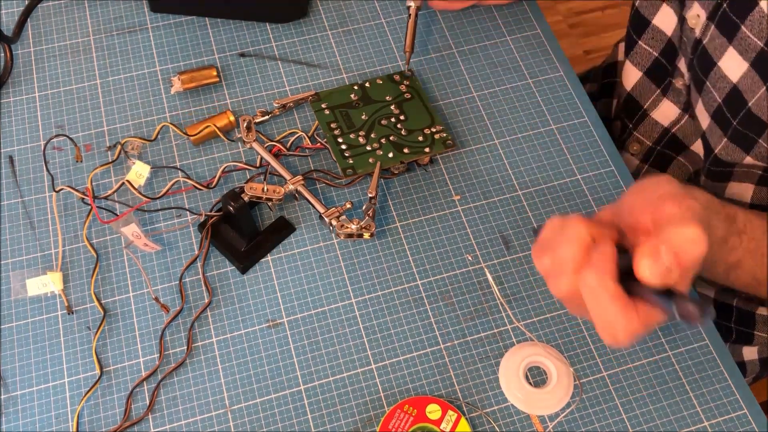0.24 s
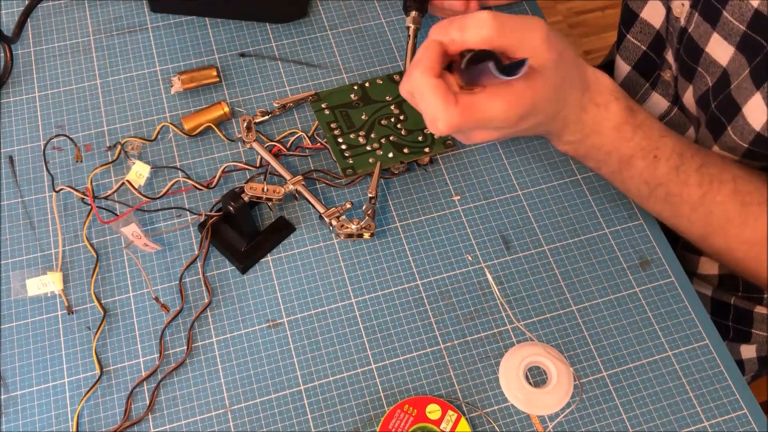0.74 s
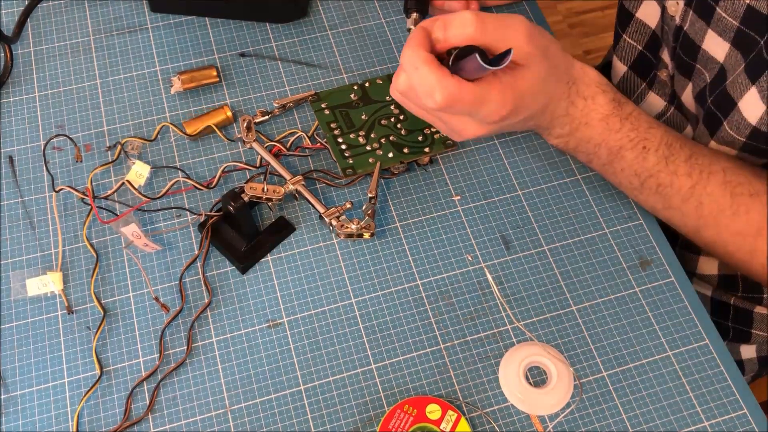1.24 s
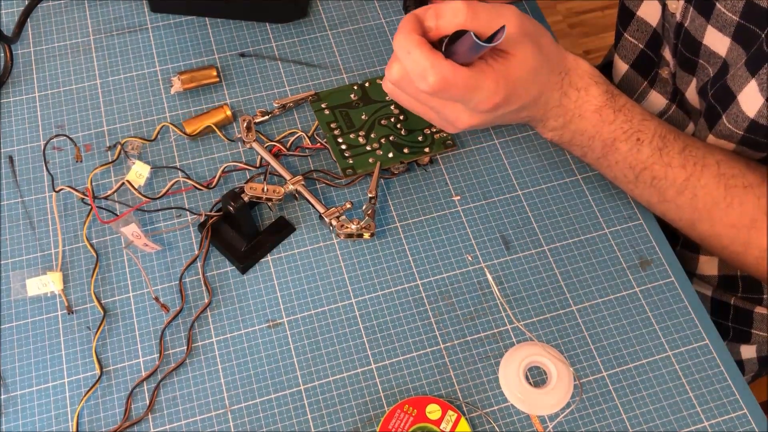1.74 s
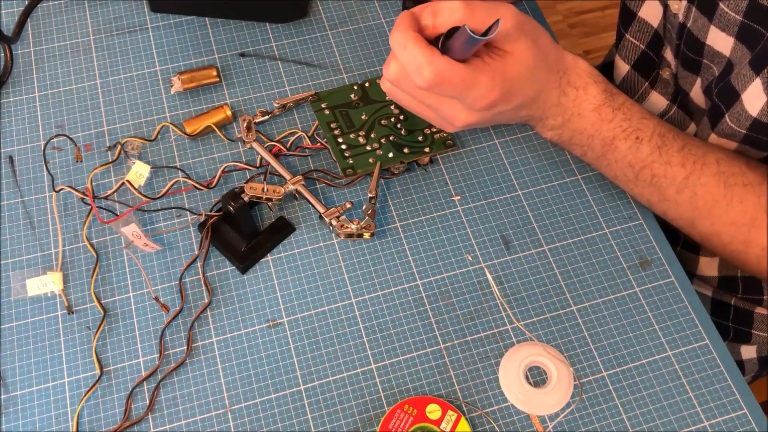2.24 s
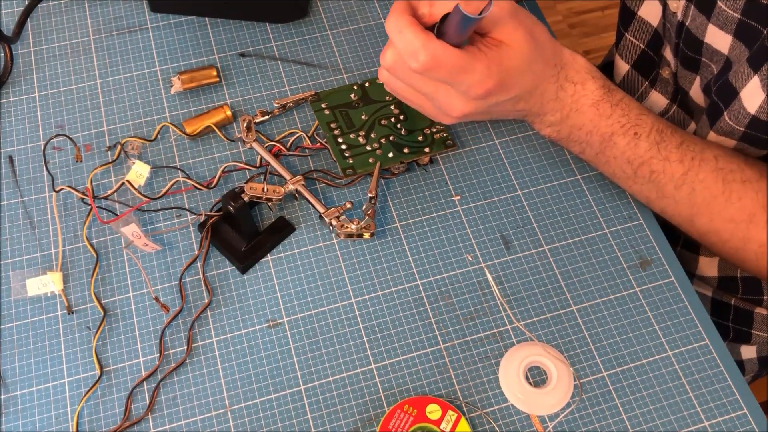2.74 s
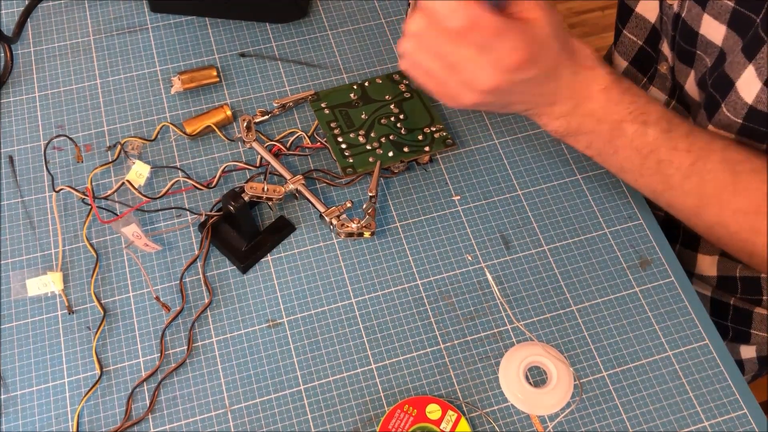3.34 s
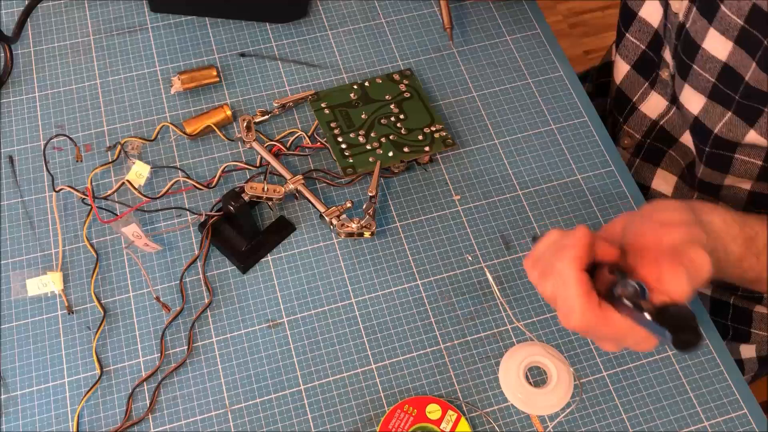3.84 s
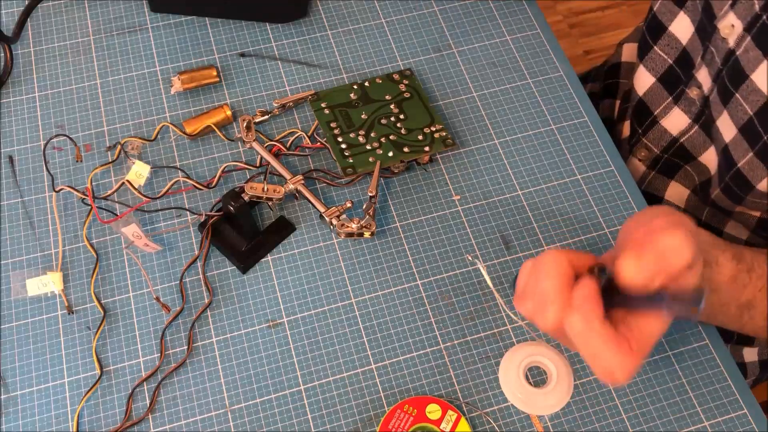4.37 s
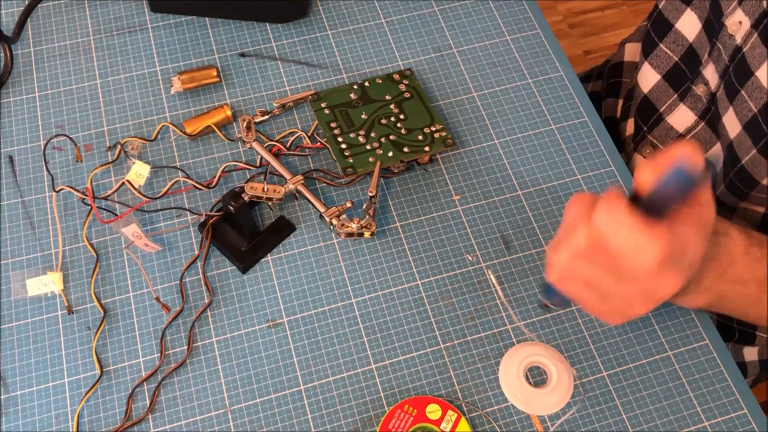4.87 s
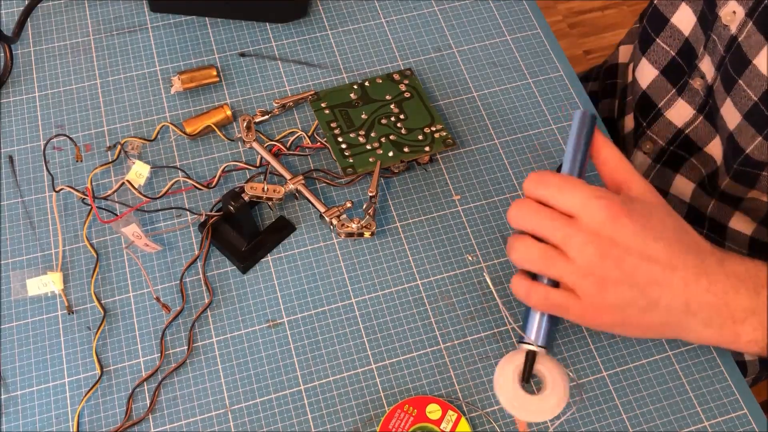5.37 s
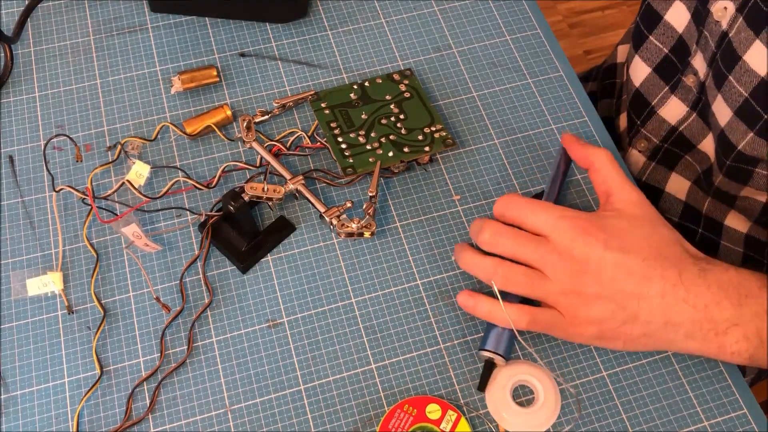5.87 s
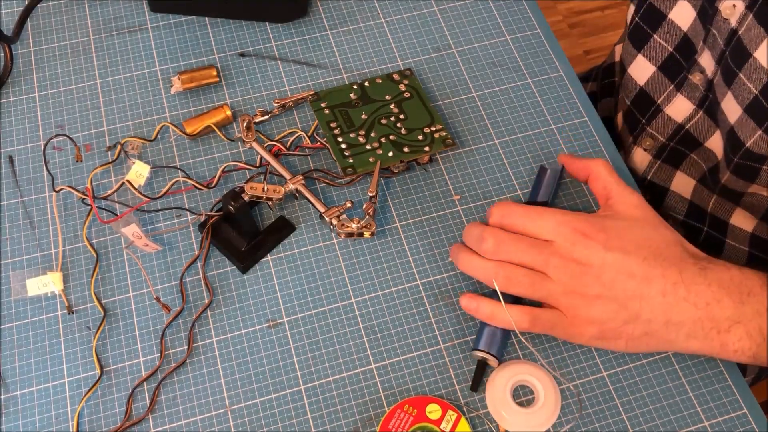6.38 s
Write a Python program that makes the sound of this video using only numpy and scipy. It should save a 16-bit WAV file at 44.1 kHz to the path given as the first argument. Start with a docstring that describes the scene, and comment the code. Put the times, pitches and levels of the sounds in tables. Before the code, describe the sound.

A small room, close microphone, low steady rumble and very faint hiss. At 0 s a spring pump's catch snaps with a short metallic twang; tiny plastic ticks follow around 0.2-0.3 s. Then near quiet, with a faint low hum swelling from 2.4 s and stopping about 3.25 s, and soft nozzle nudges on the board at 2.8 and 3.1 s. At 3.25 s the pump fires: a hard, bright double-edged snap with a rush, ringing tube and bench thump. Light ticks near 3.5 s. From 4.2 s gritty plunger friction grows into a loud latch clack at 4.35 s, then five smaller hollow knocks with chirping spring twangs until 5 s. Four soft, grainy sponge dabs at 5.3, 5.5, 5.7 and 5.9 s carry low bumps, faint sizzle and small tray ticks. At 6.4-6.5 s the iron scrapes and bounces into its stand, clattering with a short metallic ring, cut off near the end.

```python
"""Solder sucker and iron at a workbench

A spring-loaded solder sucker latches, fires on a circuit board and is cocked again, its spring twanging.
Its knocks are excited resonances with noise cracks; dispersion in the coil turns each twang into a chirp.
The soldering iron is dabbed four times on its sponge (grainy noise) and dropped into its stand (ringing modes).
A small room adds diffuse tails over a low steady rumble, a faint hiss and a brief hum.
"""
import sys
import numpy as np
from scipy import signal
from scipy.fft import rfft, irfft, next_fast_len
from scipy.io import wavfile

SR = 44100
rng = np.random.default_rng(int(sys.argv[2]) if len(sys.argv) > 2 else 0)


def master_out(mix):
    """Clip the mix to full scale and print it as 16-bit PCM to the path in sys.argv[1]."""
    frames = np.transpose(np.atleast_2d(mix))
    ceiling = np.clip(frames, -1, 1)
    pcm = np.round(ceiling * 32767).astype(np.int16)
    wavfile.write(sys.argv[1], SR, pcm)


N = 291501
T = np.arange(int(.7 * SR)) / SR  # time within one event, s
TIME = np.arange(N) / SR  # time within the scene, s

# Nozzle nudging the board. Each row: start in seconds, bench level in dB, tap level in dB.
NOZZLE_NUDGES = [(2.83, -41.5, -74.5), (3.142, -40.5, -60)]
# Catch locking the plunger. Each row: start in seconds, body level in dB, crack level in dB, room level in dB.
CATCH_LATCHES = [(-.0004, -27.5, -25, -1.5), (4.346, -19, -15.5, -9.5)]
# Squeezed spring slipping in the barrel. Each row: start in seconds, knock level in dB, travel time down
# the coil in seconds, twang level in dB, lag of 1 kHz behind the treble in seconds, rebound level in dB.
SPRING_SLIPS = [(4.476, -37.5, .010, -41, .002, -33.5), (4.589, -37.5, .0112, -31.5, 0.00102, -54),
                (4.7330, -34, .012, -36, .0027, -29), (4.8224, -35, .0143, -34.5, 0.001106, -68),
                (4.9547, -39, 0.011, -36.5, 0.004, -33)]
# Light, dry contacts in the pump. Each row: start in seconds, barrel level in dB, crack level in dB.
PUMP_CONTACTS = [(.228, -55.5, -61.5), (0.2922, -38.5, -36), (0.3095, -32, -41.5), (1.6474, -79, -69),
                 (3.2264, -63, -69), (3.5246, -42, -56), (3.551, -57, -60), (4.152, -56.5, -61.5),
                 (4.5741, -45, -37)]
# Plunger catching on its way down. Each row: start in seconds, level in dB.
PLUNGER_SNAGS = [(4.284, -43.5), (4.314, -47)]
# Dabs on the sponge. Each row: start in seconds, landing level in dB, wipe level in dB,
# bench level at landing in dB, sizzle t60 in seconds.
IRON_DABS = [(5.316, -43, -48.5, -39, 1.6), (5.524, -40.5, -57, -69, 0.13),
             (5.708, -44.5, -55, -40.5, 0.76), (5.914, -47, -55, -39, 0.4)]
# Tip ticking on the sponge tray. Each row: start in seconds, level in dB.
TRAY_TICKS = [(5.4441, -44), (5.495, -49.5), (5.5464, -43.5), (5.7549, -45.5), (6.339, -56.5)]
# Iron striking its stand. Each row: start in seconds, ring level in dB, clatter level in dB,
# scrape level in dB, bench level in dB before the low-pass of the feet.
STAND_STRIKES = [(6.407, -17.5, -22, -33.5, -26), (6.4405, -23, -24, -36, -38),
                 (6.4969, -17, -20, -23, -45), (6.508, -23, -22, -53, -16)]

# Barrel resonances, shifted together to the pitch of each knock.
# Each row: nominal centre in Hz, nominal width in Hz, level in dB.
BARREL_RESONANCES = [(1145, 160, -21), (2657, 1300, -28), (3710, 400, -5.5), (5270, 1100, -21)]
# Coil resonances, shifted together by the lag of each twang.
# Each row: nominal centre in Hz, nominal width in Hz, level in dB.
SPRING_RESONANCES = [(554, 270, -14.5), (1200, 180, -2), (1586, 180, -5), (2700, 760, -9),
                     (3600, 280, -8.5), (5470, 800, -10.5)]
# Resonances of the catch. Each row: centre in Hz, width parameter in Hz, level in dB.
CATCH_RESONANCES = [(1050, 320, -21), (2830, 550, -6), (3557, 410, -3), (3840, 440, -3), (5630, 440, -8),
                    (6330, 520, -13)]
# Narrow low tones of the room. Each row: centre in Hz, width in Hz, level in dB.
DRONE_RESONANCES = [(79, 11, 1.5), (203, 8, 1), (288.7, 2.7, -7)]

# Modes of the bench. Each row: frequency in Hz, mean relative level in dB, t60 in seconds.
BENCH_MODES = [(85, -14, .2), (110, -5, .13), (130, 0, .48), (163, -5, .28), (195, -9, .14), (285, -5, .28),
               (410, -15, .2), (465, -13, .3), (645, -18, .2)]
# Modes of the pump's tube. Each row: frequency in Hz, mean relative level in dB, t60 in seconds.
TUBE_MODES = [(985, -22, .6), (3230, -6, .28), (3400, -6, .2), (4285, -9, .3), (5585, -7, .33),
              (6697, -4, .3), (6785, 0, .32), (10470, -6, .22), (10850, -5, .3), (14090, -9, .18),
              (14665, -4, .16)]
# Modes of the iron's stand. Each row: frequency in Hz, mean relative level in dB, t60 in seconds.
STAND_MODES = [(469, -4, .35), (523, -8, .5), (634, -6, .35), (700, -7, .25), (723, -6, .25), (765, 1, .3),
               (786, -1, .3), (840, -11, .35), (880, -8, .25), (1132, -4, .18), (1154, -3, .2),
               (1293, -10, .35), (1556, -15, .25), (1637, -10, .17), (2245, -18, .3), (2837, -11, .1)]

# Bright crack of hard parts. Each row: frequency in Hz, relative level in dB per Hz.
CRACK_SPECTRUM = [(300, -36.5), (1500, -15.5), (2500, -6.5), (4600, -6.5), (7000, -4.5), (10000, -4),
                  (12500, -7), (15000, -7), (17000, -12)]
# Crack of the catch. Each row: frequency in Hz, relative level in dB per Hz.
LATCH_SPECTRUM = [(500, -47.5), (1600, -30.5), (2400, -4.5), (4600, -6), (6000, -15), (8000, -2),
                  (9700, -1.5), (11000, 0.5), (12800, -4.5), (15000, -10), (17000, -17)]
# Rush of the shot and snags of the plunger. Each row: frequency in Hz, relative level in dB per Hz.
RATTLE_SPECTRUM = [(100, -12), (350, 3), (750, -1), (1200, -10), (2200, -7), (3400, 0), (4600, -3),
                   (8500, -4.5), (11000, 1), (12500, -3.5), (15000, 0.5), (17000, -23)]
# Clatter of the stand and tap of the nozzle. Each row: frequency in Hz, relative level in dB per Hz.
CLATTER_SPECTRUM = [(80, -29), (200, -3.5), (350, -3.5), (500, 2), (800, -0.5), (1400, -4.5), (3000, -4),
                    (4500, -13), (6200, -11), (9000, -29.5), (16000, -33)]
# Scrape of the iron in its holder. Each row: frequency in Hz, relative level in dB per Hz.
SCRAPE_SPECTRUM = [(1500, -21.5), (3000, -14), (4500, -2), (6000, -2), (9500, 3), (12000, -4.5),
                   (16000, -11)]
# Rub on the sponge. Each row: frequency in Hz, relative level in dB per Hz.
SPONGE_SPECTRUM = [(53, -35), (90, -16), (142, 0), (192, -26), (284, -17), (448, 1), (661, -14),
                   (804, -5.5), (1380, -14.5), (2530, -7.5), (4080, -26), (4960, -31), (15000, -27.5),
                   (16000, -34)]
# Tick on the tray. Each row: frequency in Hz, relative level in dB per Hz.
TRAY_SPECTRUM = [(300, -8), (900, 5), (2000, -7), (4000, -6.5), (6000, -23), (15000, -25)]
# Sizzle of the damp sponge. Each row: frequency in Hz, relative level in dB per Hz.
STEAM_SPECTRUM = [(1000, -10), (3500, -17), (5000, 4), (9000, -5.5), (15000, 0.5)]
# Low rumble of the room. Each row: frequency in Hz, relative level in dB per Hz.
RUMBLE_SPECTRUM = [(12, -73.5), (20, -41.5), (60, -4), (83, -1), (107, -21.5), (130, -2.5), (187, -1.5),
                   (328, -7.5), (357, -13), (410, -12), (446, -17), (660, -23), (3740, -39.5), (14300, -44),
                   (16000, -59)]
# Faint background hiss. Each row: frequency in Hz, relative level in dB per Hz.
HISS_SPECTRUM = [(500, -4.5), (3300, -2.5), (6000, -9), (15000, -13.5)]
# Reverberation of the room. Each row: frequency in Hz, t60 in seconds.
ROOM_DECAY = [(100, 0.51), (700, 0.64), (2000, 0.52), (3600, 0.41), (6000, 0.42), (10000, 0.26),
              (15000, 0.33)]

SHOT_S, PISTON_FLIGHT_S = 3.249, .0155  # the pump fires; time until the piston hits its stop
BOUNCE_S = .0107  # the piston lands once more after this time
TRAVEL_S, LAG_S = .014, .0012  # a hard blow runs down the coil in this time, with this lag at 1 kHz
TWANG_DROOP = 0.25  # exponent: the more smeared a twang, the lower it sounds
SLIP_T60_S, SLIP_SMEAR = 0.011, 6.2  # a slip's knock lasts this long, plus this many times its lag
REBOUND_LEAD_S = .003  # the coil slaps the barrel just ahead of its twang
CLICK_T60_S, CLICK_RISE_SHARE = .007, 0.077  # decay of a light contact; rise of any contact as a share of its t60
COCKED_HZ, SLACK_HZ = 3604, 3150  # the barrel's third resonance is lower while the spring is let out
GRIP_SPREAD = .025  # spread of the log of the barrel's pitch from knock to knock
SLIDE_START_S, SLIDE_LENGTH_S = 4.22, .112
SLIDE_DB, SLIDE_GROWTH = -42.5, 1.4  # friction grows as this power of the stroke's progress
RUSTLE_S, RUSTLE_LENGTH_S, RUSTLE_DB = 3.945, 0.055, -67  # the fingers shift their grip
DAB_RISE_S, DAB_T60_S = 0.014, .16
WIPE_S = 0.047  # time from landing to wiping the tip off
SIZZLE_DB, SIZZLE_RISE_S = -57.5, 0.011
FEET_HZ = 230  # the stand's feet pass only the bass on to the bench
FLOOR_DB = -60  # room rumble
HUM_HZ, HUM_DB = 231, -54  # a faint hum and the level it reaches
HUM_START_S, HUM_LENGTH_S, HUM_RELEASE_S = 2.4, .83, .06
TOP_HZ = 15950  # band limit of the recorder


def pump_shot():
    """Impact and recoil: the piston rushes up, hits its stop and bounces, ringing tube and bench."""
    out = np.zeros(N)
    for s, bench_db, tap_db in NOZZLE_NUDGES:
        add(out, s, amp(bench_db) * ring(BENCH_MODES, rise=.02, spread_db=1))
        tap = burst(CLATTER_SPECTRUM, rise=.002, t60=.04)
        add(out, s, amp(tap_db) * in_room(tap, wet_db=1))

    release, stop = SHOT_S, SHOT_S + PISTON_FLIGHT_S
    add(out, release, barrel_click(release, barrel_db=-26.5, crack_db=-24.0, t60=.02))
    rush = burst(RATTLE_SPECTRUM, rise=0.00074, t60=0.093)
    add(out, release, amp(-19) * in_room(rush, wet_db=-3))
    tube = ring(TUBE_MODES, rise=0.004, spread_db=1)
    add(out, release, amp(-28) * in_room(tube, wet_db=-5.5))
    add(out, release + TRAVEL_S, twang(twang_db=-26.0, crack_db=-29, lag=LAG_S))

    impact = burst(CRACK_SPECTRUM, rise=0.00053, t60=0.04)
    add(out, stop, amp(-22.5) * in_room(impact, wet_db=-12.5))
    recoil = ring(BENCH_MODES, rise=0.00665, spread_db=1.5)
    add(out, stop - .003, amp(-15.0) * recoil)  # the recoil starts before the piston lands
    add(out, stop + BOUNCE_S, barrel_click(stop, barrel_db=-35, crack_db=-26.5, t60=0.0083))
    return out


def pump_latches():
    """Impulse excitation: the catch snaps into its groove, sounds its resonances and jolts the spring."""
    out = np.zeros(N)
    for s, body_db, crack_db, wet_db in CATCH_LATCHES:
        grit = rng.standard_normal(len(T)) * swell(rise=0.00072, t60=0.01)
        contact = signal.unit_impulse(len(T)) + 0.035 * grit
        knock = blow(filtered(contact, lambda hz: body(CATCH_RESONANCES, hz, order=2)))
        add(out, s, amp(body_db) * in_room(knock, wet_db + 1))  # the duller knock carries further into the room
        crack = burst(LATCH_SPECTRUM, rise=0.00044, t60=.011)
        add(out, s, amp(crack_db) * in_room(crack, wet_db))
        add(out, s + TRAVEL_S, twang(twang_db=-33.0, crack_db=-35, lag=LAG_S))
    return out


def spring_slips():
    """Stick-slip and wave travel: each slip knocks the barrel, runs down the coil, slaps its end and twangs."""
    out = np.zeros(N)
    for s, knock_db, travel, twang_db, lag, rebound_db in SPRING_SLIPS:
        knock_t60 = SLIP_T60_S + SLIP_SMEAR * lag
        add(out, s, barrel_click(s, knock_db, knock_db - 4.5, knock_t60))
        add(out, s + travel - REBOUND_LEAD_S, barrel_click(s, rebound_db, rebound_db - .8, t60=0.02))
        add(out, s + travel, twang(twang_db, crack_db=twang_db - 1.0, lag=lag))
    return out


def twang(twang_db, crack_db, lag):
    """Dispersion: bending waves in the coil carry treble faster than bass, so a jolt becomes a falling chirp."""
    jolt = signal.unit_impulse(len(T)) + .08 * rng.standard_normal(len(T)) * fade(0.017)
    droop = (lag / LAG_S) ** TWANG_DROOP

    def coil(hz):
        # group delay is lag * sqrt(1000 / hz)
        dispersion = np.exp(-4j * np.pi * lag * np.sqrt(1000 * hz))
        return body(SPRING_RESONANCES, hz * droop) * dispersion

    chirp = blow(filtered(jolt, coil))
    crack = burst(CRACK_SPECTRUM, rise=.0004, t60=0.02)
    return in_room(amp(twang_db) * chirp + amp(crack_db) * crack, wet_db=-8.5)


def barrel_click(s, barrel_db, crack_db, t60):
    """Resonance: a knock in the barrel gives a bright crack and a short hollow ring, pitched for time s."""
    slack = SHOT_S < s < SLIDE_START_S
    pitch = (SLACK_HZ if slack else COCKED_HZ) * np.exp(GRIP_SPREAD * rng.standard_normal())
    scale = BARREL_RESONANCES[2][0] / pitch  # brings the third resonance to the pitch
    rise = CLICK_RISE_SHARE * t60
    contact = rng.standard_normal(len(T)) * swell(rise, t60)
    barrel = blow(filtered(contact, lambda hz: body(BARREL_RESONANCES, hz * scale, order=2)))
    crack = burst(CRACK_SPECTRUM, rise, t60)
    return amp(barrel_db) * in_room(barrel, wet_db=-6.0) + amp(crack_db) * in_room(crack, wet_db=-8.5)


def pump_clicks():
    """Light impacts: loose parts tick as the pump is handled."""
    out = np.zeros(N)
    for s, barrel_db, crack_db in PUMP_CONTACTS:
        add(out, s, barrel_click(s, barrel_db, crack_db, CLICK_T60_S))
    return out


def plunger_slide():
    """Dry friction: gritty rubbing grows as the thumb drives the plunger down, catching now and then."""
    grit = noise(CRACK_SPECTRUM, N) * grain(N, rate=1100, depth_db=3.0)
    hollow = filtered(rng.standard_normal(N), lambda hz: body(CATCH_RESONANCES, hz, order=2))
    push = ramp(SLIDE_START_S, SLIDE_LENGTH_S, release=.018) ** SLIDE_GROWTH
    rubbing = amp(SLIDE_DB) * push * (amp(-1) * unit(grit) + amp(-5.5) * unit(hollow))
    for s, db in PLUNGER_SNAGS:
        add(rubbing, s, amp(db) * burst(RATTLE_SPECTRUM, rise=.002, t60=0.024))
    return in_room(rubbing, wet_db=-5.0)


def grip_rustle():
    """Light friction: skin brushes the barrel as noise shortly before the pump is cocked."""
    return amp(RUSTLE_DB) * ramp(RUSTLE_S, RUSTLE_LENGTH_S, release=.015) * noise(CRACK_SPECTRUM, N)


def iron_into_stand():
    """Modal ringing: the iron scrapes and bounces in its holder; the stand rings and the bench booms."""
    out = np.zeros(N)
    for s, ring_db, clatter_db, scrape_db, bench_db in STAND_STRIKES:
        clatter = amp(clatter_db) * burst(CLATTER_SPECTRUM, rise=0.0014, t60=0.032)
        scrape = amp(scrape_db) * burst(SCRAPE_SPECTRUM, rise=0.0002, t60=0.026)
        bench = ring(BENCH_MODES, rise=.09, spread_db=1.5)
        boom = filtered(bench, lambda hz: 1 / (1 + (hz / FEET_HZ) ** 4))
        add(out, s, in_room(clatter + scrape, wet_db=-4.5))
        add(out, s, amp(ring_db) * ring(STAND_MODES, rise=0.0022, spread_db=4.0))
        add(out, s, amp(bench_db) * boom)
    return out


def sponge_dabs():
    """Friction and boiling: the tip lands, sizzles and is wiped; the bench booms and the tray may tick."""
    out = np.zeros(N)
    for s, db, wipe_db, bench_db, sizzle_t60 in IRON_DABS:
        steam = noise(STEAM_SPECTRUM, len(T)) * grain(len(T), rate=140, depth_db=2.0)
        landing_boom = amp(bench_db) * ring(BENCH_MODES, rise=0.093, spread_db=1.5)
        wipe_boom = amp(bench_db - 2.5) * ring(BENCH_MODES, rise=0.017, spread_db=2.5)
        add(out, s, amp(SIZZLE_DB) * steam * swell(SIZZLE_RISE_S, sizzle_t60))
        add(out, s, amp(db) * scuff() + landing_boom)
        add(out, s + WIPE_S, amp(wipe_db) * scuff() + wipe_boom)
    for s, db in TRAY_TICKS:
        tick = burst(TRAY_SPECTRUM, rise=0.00067, t60=0.018)
        add(out, s, amp(db) * in_room(tick, wet_db=-3))
    return out


def scuff():
    """Friction coupled to modes: one grainy rub on the sponge stirs the stand."""
    rub = noise(SPONGE_SPECTRUM, len(T)) * swell(DAB_RISE_S, DAB_T60_S)
    rub *= grain(len(T), rate=160, depth_db=6.5)
    stand = ring(STAND_MODES, rise=0.013, spread_db=6)
    return in_room(rub + amp(-4) * stand, wet_db=-5.5)


def room_floor():
    """Filtered noise: low rumble and a wavering drone under a faint hiss, and a hum that swells and stops."""
    drone = unit(filtered(rng.standard_normal(N), lambda hz: body(DRONE_RESONANCES, hz)))
    rumble = amp(FLOOR_DB) * (noise(RUMBLE_SPECTRUM, N) + amp(-3) * drone)
    hiss = amp(-79) * noise(HISS_SPECTRUM, N)
    tone = unit(np.sin(2 * np.pi * HUM_HZ * TIME))
    hum = amp(HUM_DB) * ramp(HUM_START_S, HUM_LENGTH_S, HUM_RELEASE_S) * tone
    return rumble + hiss + hum


def in_room(x, wet_db, delay=0.0017):
    """Reverberation: the sound plus a fresh diffuse tail whose decay time depends on frequency."""
    hz, t, z = signal.stft(rng.standard_normal(len(T)), SR, nperseg=256)
    decay = np.exp(-np.log(1000) * t / along(ROOM_DECAY, hz)[:, None])
    tail = signal.istft(z * decay, SR, nperseg=256)[1][:len(T)]
    tail *= 1 - np.exp(-(T / delay) ** 2)  # the tail builds up softly
    return x + amp(wet_db) * signal.fftconvolve(x, tail / np.linalg.norm(tail))[:len(x)]


def body(peaks, f, order=1):
    """Resonance: a sum of band-pass peaks of alternating sign; a higher order steepens their skirts."""
    total = 0
    for k, (centre, width, db) in enumerate(peaks):
        damping = 1j * f * width
        peak = damping / (centre * centre - f * f + damping)
        total = total + (-1) ** k * amp(db) * peak ** order
    return total


def ring(modes, rise, spread_db):
    """Modal synthesis: decaying sines, with new strengths and phases for each blow."""
    tone = 0
    for hz, db, t60 in modes:
        strength = amp(db + spread_db * rng.standard_normal())
        tone = tone + strength * fade(t60) * np.sin(2 * np.pi * (hz * T + rng.random()))
    return blow(tone * (1 - np.exp(-T / rise)))


def burst(spectrum, rise, t60):
    """Enveloped noise: a short coloured puff of standard energy."""
    return blow(noise(spectrum, len(T)) * swell(rise, t60))


def noise(spectrum, size):
    """Spectral shaping: white noise coloured by a spectrum, at rms 1."""
    return unit(filtered(rng.standard_normal(size), lambda hz: amp(along(spectrum, hz))))


def grain(size, rate, depth_db):
    """Amplitude modulation: an uneven gain of rms 1 with rate new random targets a second."""
    place = np.arange(size) * rate / SR
    return unit(amp(depth_db * np.interp(place, np.arange(size), rng.standard_normal(size))))


def swell(rise, t60):
    """Attack and decay: a soft start and an exponential fall, peak 1."""
    shape = (1 - np.exp(-(T / max(rise, 1e-5)) ** 2)) * fade(t60)
    return shape / (shape.max() + 1e-20)


def fade(t60):
    """Exponential damping, 60 dB down after t60."""
    return np.exp(-np.log(1000) * T / np.maximum(t60, 1e-4))


def ramp(start, length, release):
    """Linear envelope: a gain that climbs from 0 to 1 over length and falls back over release."""
    return np.interp(TIME - start, [0, length, length + release], [0, 1, 0])


def filtered(x, response):
    """Linear filtering: the spectrum of x times a complex response of frequency."""
    m = next_fast_len(len(x) + SR // 8)
    return irfft(rfft(x, m) * response(np.fft.rfftfreq(m, 1 / SR)), m)[:len(x)]


def along(points, hz):
    """Logarithmic frequency scale: interpolates (Hz, value) points."""
    f, v = np.transpose(points)
    return np.interp(np.log(hz + 1), np.log(f), v)


def amp(db):
    """Decibel law: decibels to gain."""
    return 10 ** (np.asarray(db) / 20)


def unit(x):
    """Power normalisation: scale to rms 1."""
    return x / np.sqrt(np.mean(x ** 2) + 1e-20)


def blow(x):
    """Energy normalisation: scale to the energy of 4 ms at rms 1."""
    return x / np.linalg.norm(x) * np.sqrt(.004 * SR)


def add(track, s, x):
    """Superposition: mix x into the track at time s, cut at both ends of the track."""
    start = round(s * SR)
    part = x[max(-start, 0):max(N - start, 0)]
    track[max(start, 0):][:len(part)] += part


def scene():
    """Superposition of everything at the bench, heard by one microphone."""
    pump = pump_shot() + pump_latches() + spring_slips() + pump_clicks() + plunger_slide() + grip_rustle()
    return (pump + iron_into_stand() + sponge_dabs() + room_floor())[None]


def record(dry):
    """Band limiting: the recorder's steep low-pass."""
    return np.array([filtered(x, lambda hz: 1 / np.sqrt(1 + (hz / TOP_HZ) ** 160)) for x in dry])


dry = scene()
out = record(dry)
master_out(out)
```